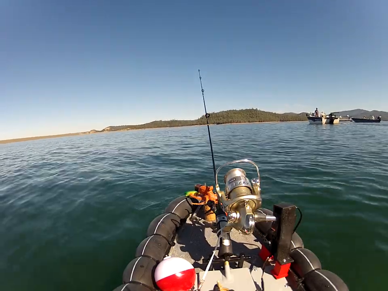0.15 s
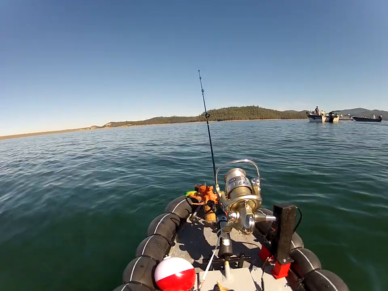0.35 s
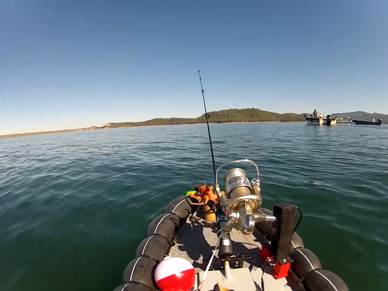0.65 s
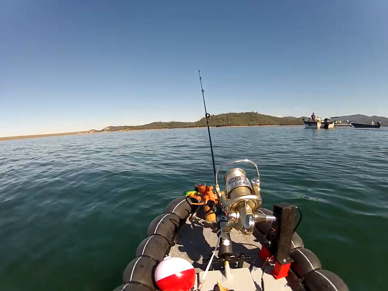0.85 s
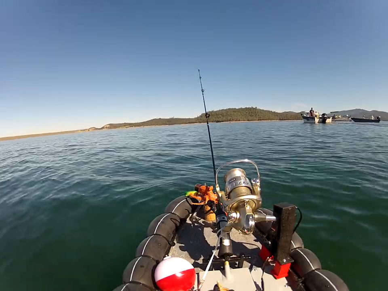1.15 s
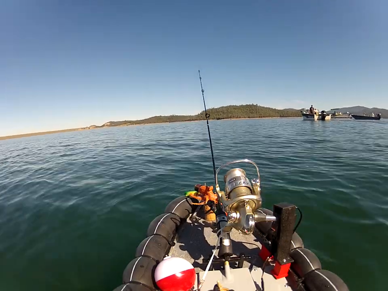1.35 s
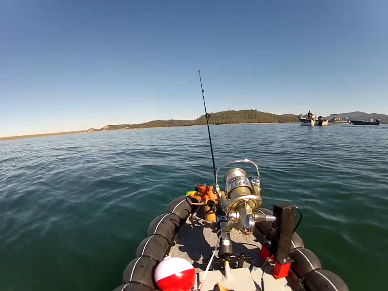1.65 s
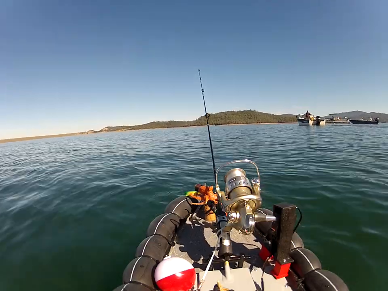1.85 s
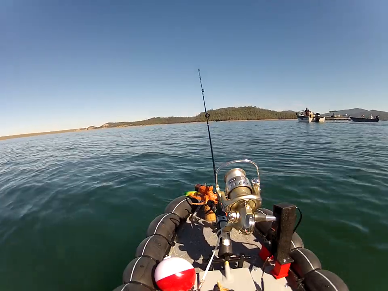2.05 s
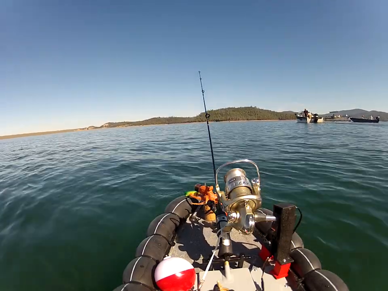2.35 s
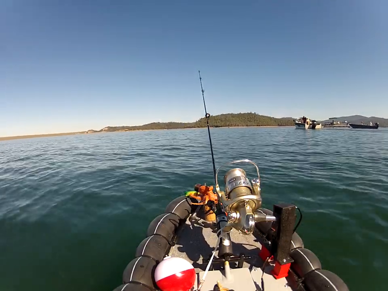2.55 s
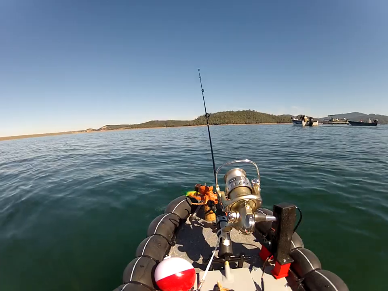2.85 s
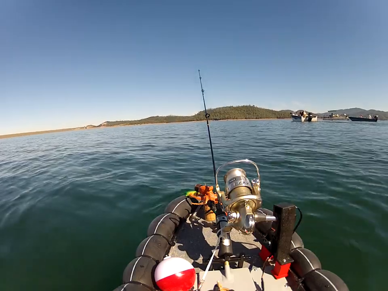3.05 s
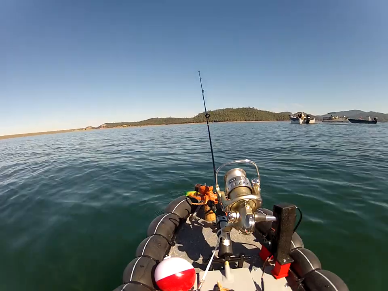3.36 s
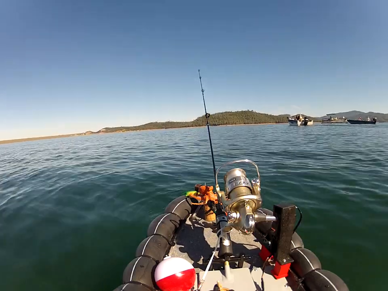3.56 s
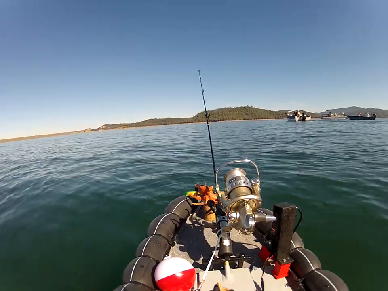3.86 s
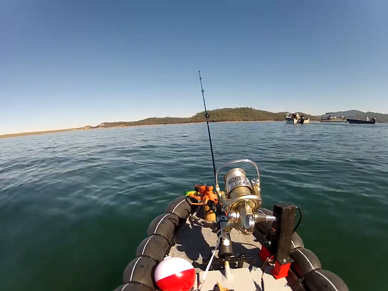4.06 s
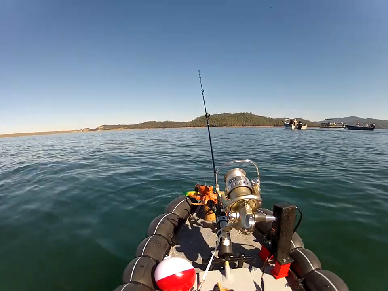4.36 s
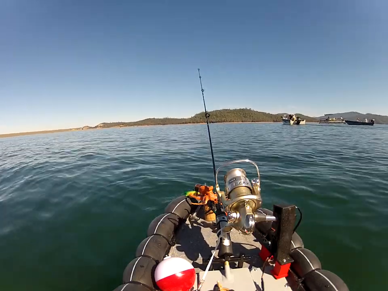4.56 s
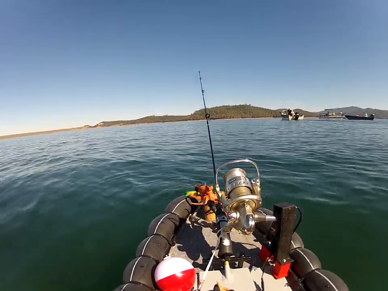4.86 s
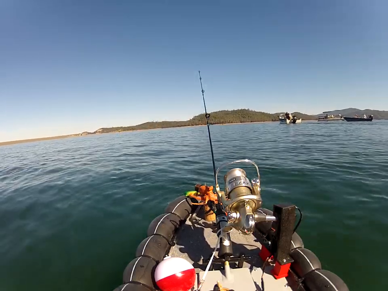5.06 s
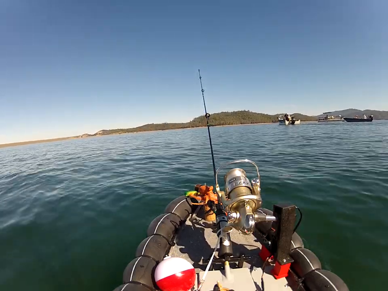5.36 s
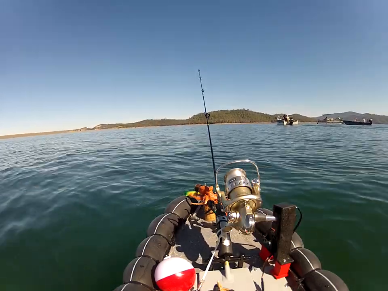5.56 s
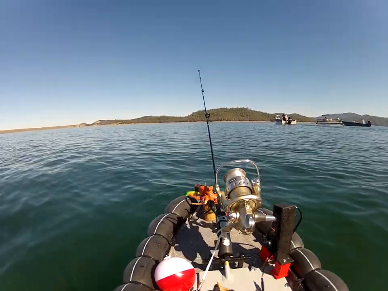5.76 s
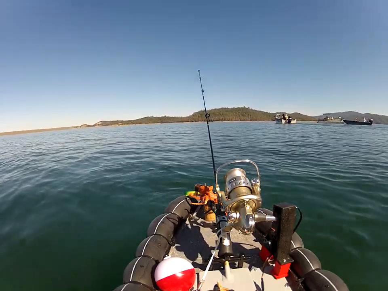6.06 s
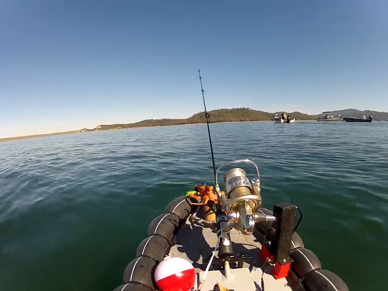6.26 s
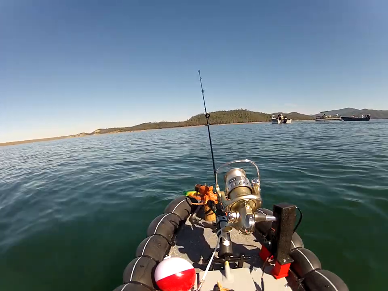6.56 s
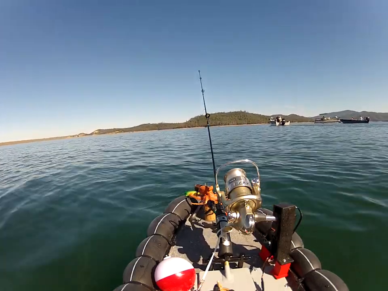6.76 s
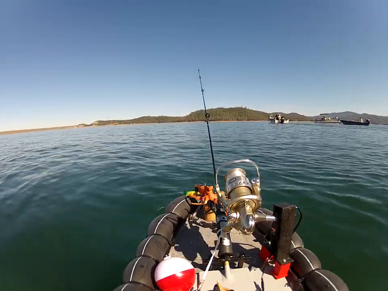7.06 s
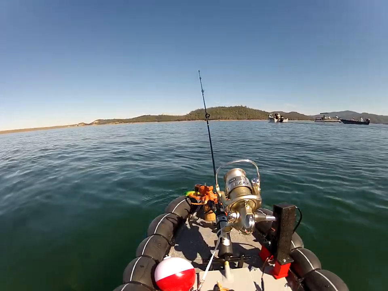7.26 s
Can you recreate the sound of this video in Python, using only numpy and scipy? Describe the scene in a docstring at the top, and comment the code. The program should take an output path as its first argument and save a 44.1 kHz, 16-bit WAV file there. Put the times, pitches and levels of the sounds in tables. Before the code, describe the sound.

A small electric motor hums and whines steadily up close, its drive rattling a hollow hull while water washes softly along it.

```python
"""A small electric motor drives a model boat across a calm lake, heard from a camera on its deck.
From the start the unbalanced shaft hums, the drive whines and rattles the hull, and water washes along it.
Swells keep shifting the balance of the hum, ripples nudge the hull, and the drive now and then catches or slips.
From the third second on, five droplets tick on the deck.
The camera's slow sampling clock mirrors the band as a thin sizzle in the treble throughout."""
import sys
import numpy as np
from scipy import signal
from scipy.fft import rfft, irfft
from scipy.io import wavfile
from scipy.ndimage import uniform_filter1d

SR = 44100
rng = np.random.default_rng(int(sys.argv[2]) if len(sys.argv) > 2 else 0)


def transcribe(u):
    """Save the signal u as a 16-bit wav file named by the first command-line argument.

    u: samples, shape (n,) or (channels, n), limited to [-1, 1]; the rate is SR.
    q: integer samples, one column per channel.
    """
    v = np.clip(np.atleast_2d(u).T, -1, 1)
    q = np.round(v * 32767).astype(np.int16)
    wavfile.write(sys.argv[1], SR, q)


N = 327222


def undb(db):
    """Decibel law: 20 dB is a factor of ten in amplitude."""
    return 10 ** (np.asarray(db) / 20)


def level(x, db):
    """Root-mean-square scaling: bring a signal to the given rms level."""
    return x * undb(db) / np.sqrt(np.mean(x ** 2))


def wobble(rate_hz):
    """Low-passed chance: noise of unit rms, its spectrum halved at the rate and falling beyond."""
    f = np.fft.rfftfreq(N, 1 / SR)
    spectrum = rfft(rng.standard_normal(N)) / (1 + (f / rate_hz) ** 2)
    return level(irfft(spectrum, N), 0)


def bumps(table):
    """Superposition of cosine-squared bumps: each row swells and fades about its centre time.

    Columns are centre_s, length_s and one height for each curve returned.
    """
    rows = np.array(table)
    place = (np.arange(N) / SR - rows[:, :1]) / rows[:, 1:2]
    shape = np.cos(np.pi * np.clip(place, -.5, .5)) ** 2
    return rows[:, 2:].T @ shape


def causal(db):
    """Minimum phase: folding the cepstrum makes a passive body ring after a blow, never before."""
    cepstrum = irfft(np.log(undb(db)))
    half = len(cepstrum) // 2
    cepstrum[1:half] *= 2
    cepstrum[half + 1:] = 0
    return np.exp(rfft(cepstrum))


def colour(x, points, skirt_db=24):
    """Linear filtering by (Hz, dB) points; beyond the ends the gain falls by the skirt per octave."""
    hz, db = np.transpose(points)
    octave = np.log2(np.fft.rfftfreq(2 ** 13, 1 / SR) + 1)
    known = np.log2(hz)
    beyond = abs(octave - np.clip(octave, known[0], known[-1]))
    gains = np.interp(octave, known, db) - skirt_db * beyond
    return signal.fftconvolve(x, irfft(causal(gains)))[:N]


def motor(evenness=0.55, slip_depth=0.38, flutter_db=.5, looseness_db=0.9):
    """Common rotation: one shaft speed times the hum, the whine and the rattle."""
    # the drive catches, slows and changes its rattle: centre_s, length_s, speed_sag_hz, rattle_rise_db
    catches = [(.7, .12, 0.98, 4), (.93, 0.093, 0.96, 2.5), (1.16, 0.13, 0.91, 2.5),
               (1.8, 0.23, 0.64, -0.5), (2.37, .21, 0.65, 1.5), (2.69, 0.198, 0.88, 4),
               (3.68, 0.59, 0.87, 1), (4.2, 0.19, 0.83, 0), (4.92, .17, .3, 0), (5.1, 0.18, 0.52, 1),
               (6.53, 0.088, 0.31, 4), (6.94, 0.25, 1.51, 4), (7.13, 0.14, 1.11, 3.5),
               (7.29, .13, 1.34, 0.5)]
    # the contact slips and the buzz dips: centre_s, length_s, dip_db
    slips = [(0.48, 0.13, 1), (2.71, 0.027, 6.5), (3.28, 0.22, 1.5), (4.25, 0.18, 1), (7.13, 0.046, 3.4)]
    shaft_hz = 107.2  # turns per second when running free
    knock_lag = .16  # turns by which the knocks trail each swing of the hull
    rattle_db, buzz_db = -5.5, -37.5  # rattle relative to whine; rms of both together before the long slips

    sag_hz, catch_db = bumps(catches)
    drift = .003 * wobble(5)  # share of the speed
    speed_hz = shaft_hz * (1 + drift) - sag_hz
    turns = np.cumsum(speed_hz) / SR

    loose_db = rattle_db + catch_db + looseness_db * wobble(8)
    buzz = whine(turns - knock_lag) + undb(loose_db) * rattle(turns - knock_lag)
    # turns share energy more evenly: what the rattle takes, the whine loses
    power = uniform_filter1d(buzz ** 2, int(SR / shaft_hz))
    buzz = buzz / power ** (evenness / 2)
    # between the long slips the contact also lets go briefly at random
    brief_slip = np.clip(slip_depth * (wobble(27) - 1.3), 0, .7)
    buzz = level(buzz * (1 - brief_slip) * undb(flutter_db * wobble(50)), buzz_db)
    return hum(turns) + undb(-bumps(slips)[0]) * buzz


def hum(turns, shake_db=0.34, waver_db=1., dispersion=0.4845, once_sway_db=.5, twice_sway_db=1.1, cog_sway_db=1.48):
    """Forced vibration: unbalance shakes the hull once a turn, the coupling twice, the poles six times."""
    # overtones of the shaft, levels before they waver: multiple, rms_db
    overtones = [(4, -57.5), (5, -64.2), (7, -64), (8, -60.3), (9, -56.8), (10, -60)]
    # swells shift the balance: centre_s, length_s, rise_db (six a turn), dip_db (two a turn)
    swells = [(0.18, 0.31, -5, 5.5), (0.67, 0.53, 6, 2.5), (1.42, 0.7, 6, 4.5), (2.43, 0.41, 6.5, 3),
              (3.12, 0.25, 0.2, 4), (3.4, 0.45, 6, 2), (4.04, 0.29, 5, 8), (4.86, 0.36, 3.5, 3),
              (5.47, 0.47, 2.5, 6), (6.55, 0.45, -1, 4), (6.98, 0.34, 5.5, 6.5)]
    # the once-a-turn hum grows louder for a moment: centre_s, length_s, rise_db
    surges = [(0.94, 0.37, 2.5), (1.38, 0.1, 4), (5.17, 0.25, 2.5), (5.99, 0.16, 2.5), (6.95, 0.092, 5.5)]

    rise_db, dip_db = bumps(swells)
    # rms levels on level water, then their changes
    once_db = -37 + bumps(surges)[0] + once_sway_db * wobble(4.9)
    twice_db = -41.5 - dip_db + twice_sway_db * wobble(13)
    cog_db = -52.5 + rise_db + cog_sway_db * wobble(5)
    lines = [(1, once_db), (2, twice_db), (6, cog_db)]
    lines += [(k, db + waver_db * wobble(1.1)) for k, db in overtones]

    tone = np.zeros(N)
    for k, db in lines:
        # dispersion of bending waves staggers the phases, so the overtones do not line up in a pulse
        phase = 2 * np.pi * k * turns + dispersion * k * (k - 1)
        tone += np.sqrt(2) * undb(db) * np.cos(phase)
    return tone * undb(shake_db * wobble(27))


def whine(turns, play=0.0016, order=11):
    """Fourier series of the knocking drive: high partials of the shaft, with minimum-phase ringing."""
    # partials at successive multiples of the shaft rate, from the 11th up: relative level_db
    partials_db = [0, -16, -4.6, -14.8, -16, -18.2, -23, -28.5, -32, -39, -30.5, -30.5]
    orders = order + np.arange(len(partials_db))
    gains = np.full(2 ** 6, -36.)
    gains[orders] = partials_db
    ring = causal(gains)
    # play in the shaft, in turns rms, lets the knocks come a little early or late
    angle = 2 * np.pi * (turns + play * wobble(45))
    tone = sum(np.real(ring[k] * np.exp(1j * k * angle)) for k in orders)
    return level(tone, 0)


def rattle(turns, rub_db=2.5, scatter_s=0.0001):
    """Impact excitation: uneven knocks, two a turn, and steady bearing rub ring the hull."""
    knocks = np.flatnonzero(np.diff(np.floor(2 * turns)))
    strength, timing = rng.uniform(-0.81, 1, (len(knocks), 2)).T
    late = (scatter_s * SR * timing).astype(int)
    blows = np.zeros(N)
    blows[np.clip(knocks + late, 0, N - 1)] = strength
    # the rub's level is relative to the knocks
    rub = level(rng.standard_normal(N), rub_db)
    return level(hull(level(blows, 0) + rub), 0)


def hull(x, top_hz=2520):
    """Modal resonance: hull modes add in power; the foam floats swallow what lies above them."""
    # modes of hull and deck: pitch_hz, width_hz (about 5 dB down), relative level_db
    modes = [(475, 111, -18.5), (631.4, 55, -10.5), (780, 73, -15.5), (902, 136, -8.5), (1169.5, 99, 4.5),
             (1334, 134, -3), (1427, 71, -8.5), (1593, 67, -3), (1683, 90, -9.5), (1915, 106, -12),
             (2230, 430, -20.5), (2500, 140, -19)]
    f = np.fft.rfftfreq(2 ** 13, 1 / SR)
    power = sum(undb(db) ** 2 / (1 + (1.74 * (f - hz) / width) ** 2) ** 2 for hz, width, db in modes)
    gains = 10 * np.log10(power / (1 + (f / top_hz) ** 50) + 1e-10)
    return signal.fftconvolve(x, irfft(causal(gains)))[:N]


def nudges():
    """Amplitude-modulated oscillation: each ripple sways the hull under a half-sine envelope."""
    # ripples: start_s, level_db (peak), pitch_hz, length_s
    ripples = [(0.024, -55, 36.4, 0.25), (2.38, -53, 37.54, .22), (3.06, -55, 34.56, 0.27),
               (3.72, -53, 36.26, 0.34), (4.88, -57, 36.1, 0.23), (6.635, -37, 133.5, 0.088),
               (6.65, -48, 44.04, 0.088), (7.3, -44, 35.7, 0.1)]
    out = np.zeros(N)
    for start, db, hz, length in ripples:
        age = np.arange(N) / SR - start
        envelope = np.sin(np.pi * np.clip(age / length, 0, 1))
        out += undb(db) * envelope * np.sin(2 * np.pi * hz * age)
    return out


def water():
    """Filtered turbulence noise: water washes along the hull under a faint hiss."""
    # wash spectrum: pitch_hz, relative density_db (per Hz)
    wash_points = [(22, -27.5), (36, -13.5), (52, -11), (68, -22.5), (92, -1), (125, -4), (150, -8),
                   (190, -6.5), (255, -15), (280, -13.5), (350, -22.5), (700, -23.5)]
    # fine hiss spectrum: pitch_hz, relative density_db (per Hz)
    hiss_points = [(2650, -3.5), (3000, -3.5), (3350, -8), (3620, -2), (3900, -8.5), (5000, -10)]
    wash = colour(rng.standard_normal(N) * undb(1.3 * wobble(9.2)), wash_points)
    hiss = colour(rng.standard_normal(N) * undb(0.82 * wobble(20)), hiss_points, skirt_db=6.5)
    return level(wash, -51.5) + level(hiss, -70.0)


def drops(decay_s=0.004, rise_s=0.0011):
    """Damped oscillation: a droplet gives a short ring and a pinch of spray in the same band."""
    # droplets: start_s, level_db (ring before its envelope), pitch_hz, spray_db (rms relative to half the ring)
    droplets = [(2.583, -59.5, 3310, 10), (3.7795, -54, 3520, 2), (4.902, -59, 3110, 3),
                (5.3445, -45.5, 3520, 0), (6.6225, -55, 3100, 5)]
    out = np.zeros(N)
    age = np.arange(SR // 25) / SR
    envelope = np.exp(-age / decay_s) * (1 - np.exp(-age / rise_s)) ** 2
    band = signal.butter(4, (2600, 4200), "band", fs=SR, output="sos")
    for s, db, hz, spray_db in droplets:
        spray = level(signal.sosfilt(band, rng.standard_normal(len(age))), spray_db) / 2
        tick = (np.sin(2 * np.pi * hz * age) + spray) * envelope
        start = int(s * SR)
        out[start:start + len(age)] += undb(db) * tick
    return out


def scene():
    """Linear superposition: motor, ripples, water and droplets add at one microphone."""
    return (motor() + nudges() + water() + drops())[None]


def record(dry, mirror_db=0.5, edge_hz=5500, clock_hz=12000, top_hz=14900):
    """Sampling images: the camera's clock mirrors its band about the clock rate, and holding tilts it."""
    f = np.fft.rfftfreq(N, 1 / SR)
    # the band stays under half the clock rate
    band = signal.sosfilt(signal.butter(14, edge_hz, fs=SR, output="sos"), dry)
    # only the first pair of images is formed
    clock = np.cos(2 * np.pi * clock_hz * np.arange(N) / SR)
    sampled = band * (1 + 2 * undb(mirror_db) * clock)
    # holding each sample weights the spectrum by a sinc
    held = irfft(rfft(sampled) * np.sinc(f / clock_hz), N)
    return signal.sosfilt(signal.ellip(8, .2, 70, top_hz, fs=SR, output="sos"), held)


dry = scene()
out = record(dry)
transcribe(out)
```